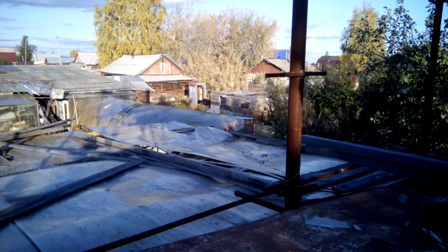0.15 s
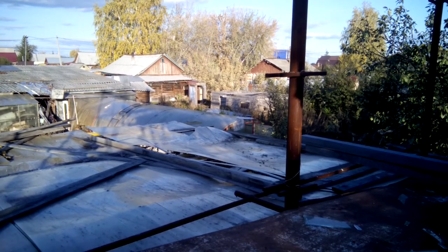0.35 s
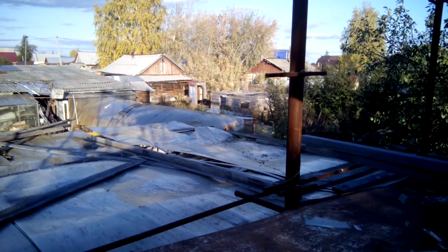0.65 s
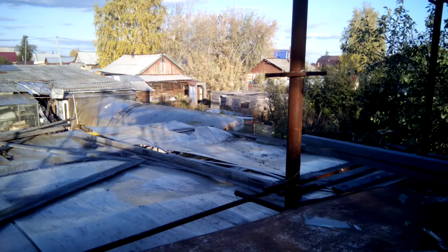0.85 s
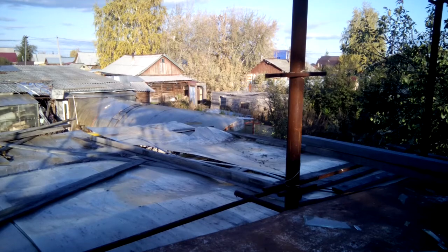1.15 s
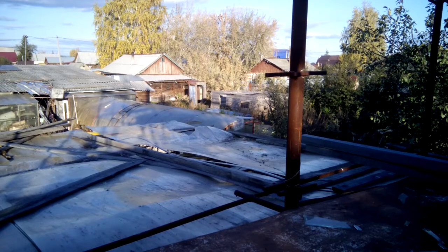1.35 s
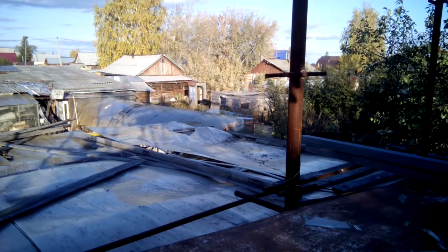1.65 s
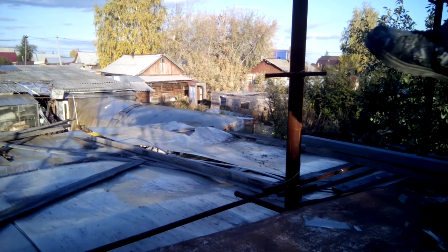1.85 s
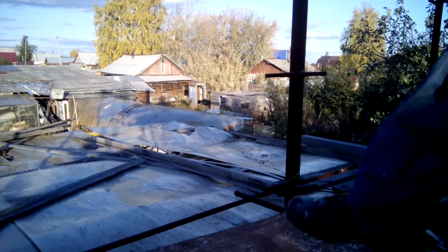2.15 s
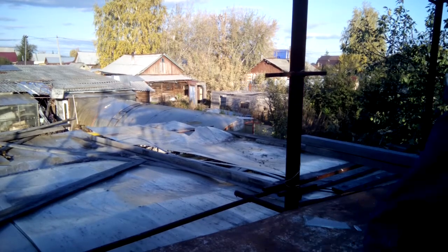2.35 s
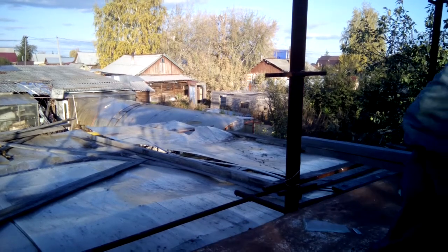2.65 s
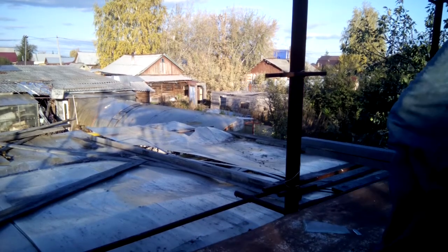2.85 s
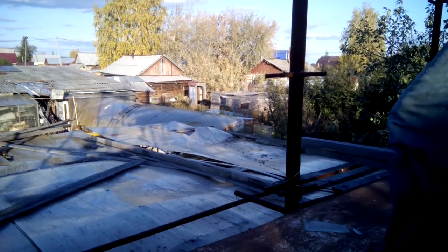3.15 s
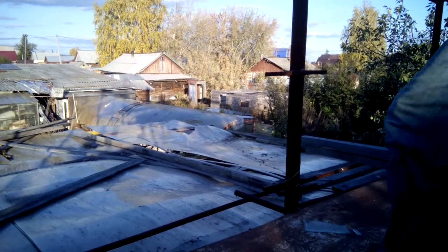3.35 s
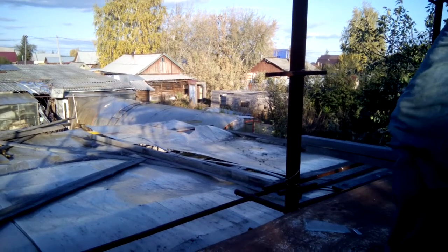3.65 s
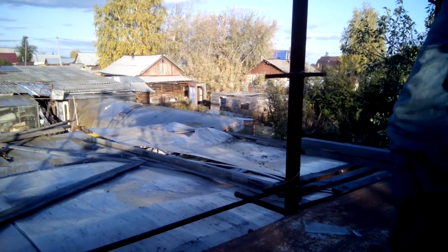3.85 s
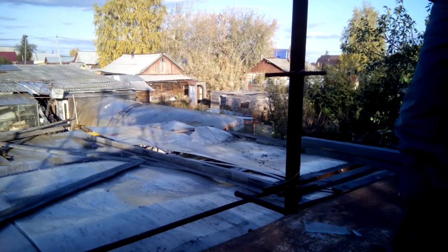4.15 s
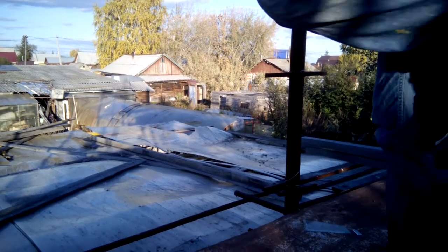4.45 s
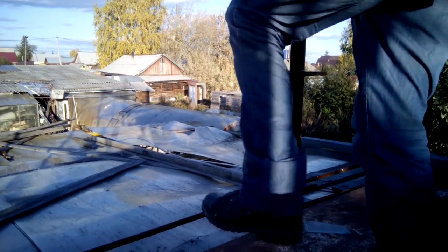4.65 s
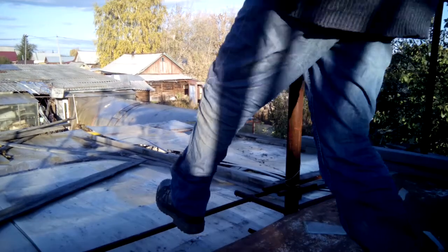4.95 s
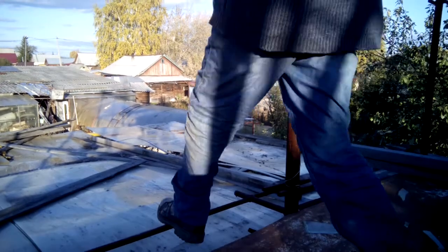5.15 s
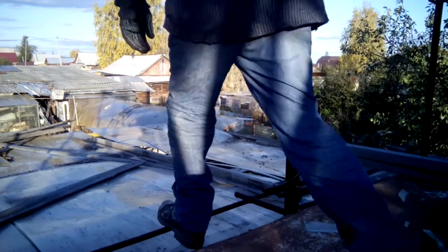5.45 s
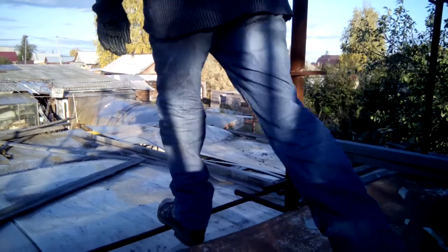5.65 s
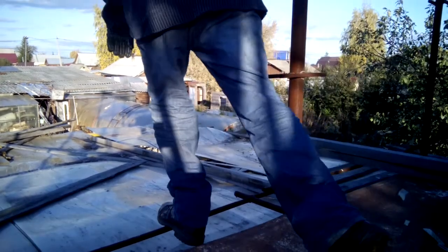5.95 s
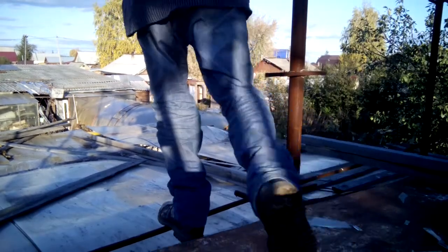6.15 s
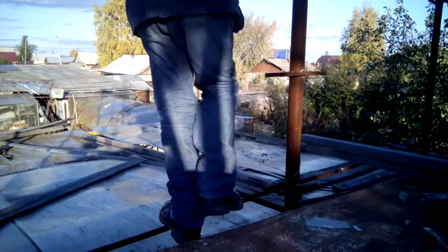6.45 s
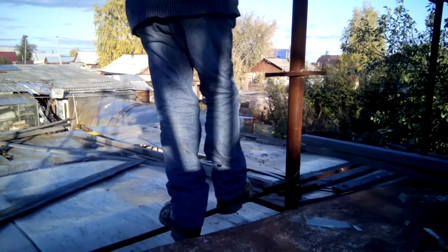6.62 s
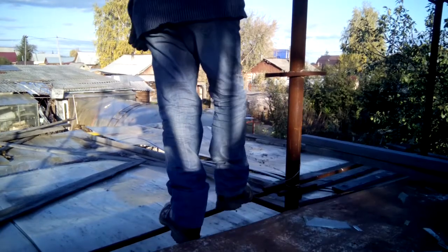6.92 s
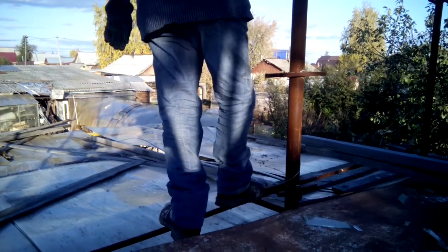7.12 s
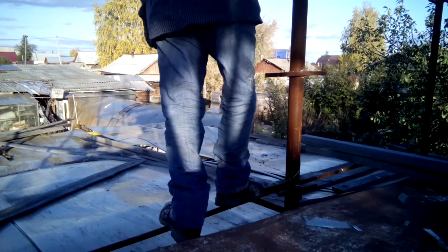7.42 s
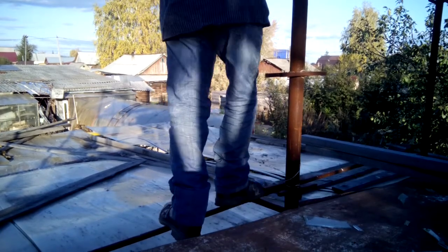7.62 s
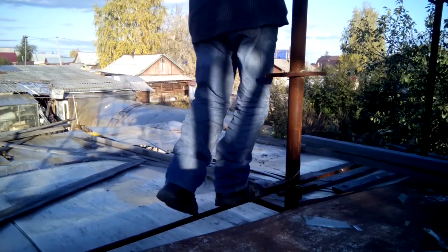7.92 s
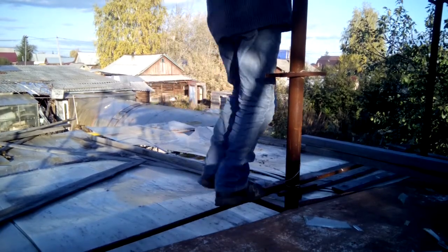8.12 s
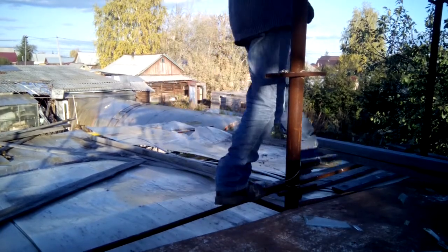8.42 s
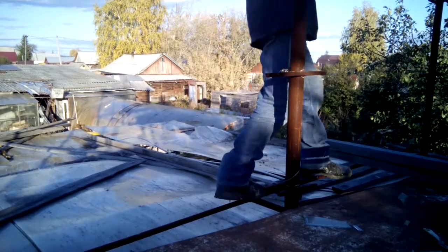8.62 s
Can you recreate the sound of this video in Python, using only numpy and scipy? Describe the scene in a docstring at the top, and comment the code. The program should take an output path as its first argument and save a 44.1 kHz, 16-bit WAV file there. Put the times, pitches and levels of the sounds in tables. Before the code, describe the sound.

Close, uneven boot clacks and gritty shuffles rattle a metal roof outdoors while a machine rumbles softly far away.

```python
"""Boots on a sheet-metal roof

Outdoors, close to the microphone and a little to the left, boots step, shuffle and knock on a roof
and its steel frame. Each contact sets the sheet's dense modes crashing; grit scrapes under the soles,
the sheet snaps, the frame creaks, loose steel chinks. Far off, a machine rumbles and hums over the
village. The microphone's right port hears less treble."""
import sys
import numpy as np
from scipy import signal
from scipy.fft import rfft, irfft, next_fast_len
from scipy.io import wavfile
from scipy.ndimage import uniform_filter1d, map_coordinates

SR = 44100
rng = np.random.default_rng(int(sys.argv[2]) if len(sys.argv) > 2 else 0)


def put_to_file(sound):
    """Save the sound as 16-bit audio at rate SR, in the file named by the first command-line argument."""
    columns = np.atleast_2d(sound).T  # one column per channel
    safe = np.clip(columns, -1, 1)
    whole_steps = np.round(safe * 32767)
    wavfile.write(sys.argv[1], SR, whole_steps.astype(np.int16))


N = 387198

# Boots striking the roof: start_s, level_db, grit_db (relative to level), pitch_hz
KNOCKS = [(0.503, -27, -29, 654), (0.576, -25, -38, 407), (0.619, -30.5, -9.5, 440),
          (0.688, -29.5, -12, 455), (0.748, -20.5, -28.5, 456), (0.793, -25.5, -31, 464),
          (0.817, -21.5, -18.5, 473), (0.882, -20.5, -8.5, 450), (0.945, -32.5, -8, 500),
          (1.08, -31, -8, 563), (1.119, -31.5, -6, 1010), (1.154, -27.5, -15, 423),
          (1.219, -26.5, -26, 495), (1.318, -41, -2, 498), (1.347, -24.5, -10, 420), (1.385, -27, -28, 447),
          (1.478, -53, 0, 506), (1.635, -30.5, -12.5, 553), (1.66, -34, -15, 510), (1.717, -54.5, 7.5, 533),
          (2.156, -12.5, -26.5, 413), (2.392, -8.5, -18.5, 526), (2.581, -24, -19, 550),
          (2.714, -24.5, 1, 397), (2.733, -6.5, -12.5, 598), (2.789, -17, -3.5, 427),
          (2.831, -22.5, -1, 704), (2.884, -37, -3.5, 600), (2.939, -36, -7, 600), (3.174, -20, -14, 643),
          (3.379, -38, -12, 401), (3.408, -34, -4.5, 732), (3.481, -22.5, -9.5, 614),
          (3.589, -26, -12.5, 406), (3.63, -22.5, -5, 705), (3.651, -8.5, -15, 484),
          (3.689, -19.5, -3, 420), (3.728, -19.5, -2, 816), (3.768, -22.5, -6.5, 665),
          (3.823, -12, -17, 564), (3.89, -15.5, -11.5, 1246), (3.982, -18, -15.5, 1045),
          (4.649, -32.5, -19.5, 560), (4.832, 1.5, -14.5, 703), (4.995, -19.5, 0.5, 778),
          (5.059, -18.5, -10.5, 514), (5.299, -26, -10.5, 1190), (5.312, -12.5, -23.5, 576),
          (5.322, -15.5, -20, 580), (5.395, -20, -13, 620), (5.413, -20, -16.5, 424),
          (5.534, -12, -14, 640), (5.558, -15.5, -17.5, 556), (5.669, -22, -8.5, 788),
          (5.722, -13.5, -12, 614), (5.759, -19, -11.5, 472), (6.209, -33.5, -1, 855),
          (6.263, -15, -20, 403), (6.273, 0, -16, 701), (6.735, -24, -12.5, 560),
          (6.742, -28.5, -12.5, 950), (6.849, -40, -12.5, 546), (7.19, -39, -22.5, 800),
          (7.268, -45.5, -9, 788), (8.236, -38.5, -18, 700)]
# The sheet's modes: pitch_hz, level_db
SHEET_MODES = [(275, 2.5), (375, -2), (447, 0), (490, -2.5), (585, -6), (650, -7), (720, -12), (778, -2),
               (860, -3), (1030, -4), (1163, -1), (1357, -2.5), (1590, 7.5), (1837, 4.5), (2250, 4.5),
               (2725, 0), (3224, 3)]
# Body weight landing: start_s, level_db, pitch_hz
LANDINGS = [(0.759, -28.5, 273.5), (2.157, -18.5, 207.7), (2.39, -24.5, 189), (2.794, -19, 172),
            (3.179, -28, 168), (4.844, -26, 149), (5.308, -28, 143), (5.553, -15, 108), (5.751, -26, 139),
            (6.28, -14.5, 348)]
# Soles sliding: middle_s, level_db, half_length_s, crunch_db (offset on CRUNCH_DB)
SLIDES = [(.22, -64, 0.019, -2), (0.653, -44, 0.025, -10), (0.77, -40.5, 0.035, -2),
          (1.175, -46, 0.078, -4), (1.754, -55, 0.11, 5), (2.205, -32, 0.033, 0), (2.306, -49, 0.055, -7),
          (2.648, -35, 0.038, -4), (2.772, -28.5, 0.075, 6.5), (3.196, -44, 0.043, -1),
          (3.338, -54.5, 0.022, -5), (3.715, -30.5, 0.049, 1), (4.123, -54, 0.018, 2),
          (4.678, -53.5, .03, -3), (4.92, -23.5, 0.06, 5), (5.054, -30, 0.027, 5),
          (5.355, -38, 0.045, -1.5), (5.466, -45, 0.044, 4.5), (5.545, -31, 0.045, 3),
          (5.761, -30, 0.064, -1), (6.362, -24.5, 0.061, 1), (6.47, -38, 0.055, -8), (6.65, -36, 0.04, 2.5),
          (6.997, -59.5, 0.008, 0), (7.61, -58, .009, 2), (8.275, -55, 0.038, -10)]
# The sheet buckling: start_s, level_db, t60_s
BUCKLES = [(0.820, -35.5, 0.1), (0.885, -27, 0.079), (1.3167, -47, 0.055), (1.351, -39, .05),
           (1.48, -47.5, .05), (2.737, -22.5, 0.033), (3.633, -26.5, 0.036), (3.8885, -30, 0.043),
           (3.9832, -32.5, .06), (4.994, -14, .07), (5.723, -26, .05)]
# Loose steel touched: start_s, level_db
BAR_TOUCHES = [(4.84, -30), (4.994, -26), (5.024, -31), (5.06, -33), (5.73, -39)]
# The steel bar's modes: pitch_hz, level_db, t60_s
BAR_MODES = [(2218, -8, .15), (3225, -3, .12), (4849, -1, .22), (4985, -5, .08), (5433, -1, .15),
             (6300, -3, .07), (6595, -4, .07), (7190, -1, .08), (7769, -13, .1), (9265, -10, .08)]
# The frame under shifting weight, a faint squeak, tiny pings: start_s, level_db, length_s
FRAME_CREAKS = [(0.578, -45, 0.054), (0.75, -40, 0.1), (1.117, -31, 0.055), (1.2, -36.5, 0.028),
                (1.385, -29.5, 0.041)]
SQUEAKS = [(.2, -64, 0.057)]
PINGS = [(5.163, -61, .008), (5.265, -61.5, .01)]
# Their resonances: pitch_hz, width_hz, level_db
FRAME_HOLLOWS = [(464, 73, -0.5), (1020, 110, -0.5), (2210, 110, -6.5), (2530, 170, -10.5),
                 (2900, 150, -12), (3680, 78, -14)]
SQUEAK_BAND = [(4200, 120, 0)]
PING_BAND = [(7750, 150, 0)]
# The distant background over time: time_s, rumble_db, haze_db
VILLAGE_LEVELS = [(0.0, -29.5, -51), (0.64, -32.5, -52), (5.82, -32.5, -53), (8.78, -36, -55)]
# The far machine's hum: pitch_hz, level_db
HUM_TONES = [(555, -61.5), (1112, -73.5)]

# Noise spectra: frequency_hz, relative_density_db
BOOM_SPECTRUM = [(30, -41), (60, -4.5), (110, 6), (250, 3.5), (450, -2.5), (900, -76)]  # the roof's slow flexing
GRIT_SPECTRUM = [(470, -29), (800, -1), (985, -7.5), (1310, -5.5), (1550, -4), (5950, -17), (8500, -48),
                 (11000, -59.5), (18700, -120)]  # sand between sole and sheet
SIZZLE_SPECTRUM = [(4240, -26.5), (7200, 9), (8250, -11), (9070, -3.5), (11800, -11), (15700, -33)]  # the sand's finest edge
RUB_SPECTRUM = [(210, -32.5), (350, -2), (630, -1), (1170, -7.5), (1660, -9), (6330, -20), (7900, -37),
                (11600, -51), (15700, -69.5)]  # a sole sliding on the sheet
CRUNCH_SPECTRUM = [(3000, -41), (6000, -7), (8000, -2), (12000, -7), (14500, -15.5), (16500, -59.5)]  # grains crushed under the slide
SNAP_SPECTRUM = [(700, -22), (1500, -1), (5000, 6), (7500, -11), (9000, -15.5), (13000, -22.5),
                 (16000, -44.5)]  # the buckling sheet
RUMBLE_SPECTRUM = [(12, -51), (20, -21), (54, -10.5), (74, -3.5), (96, -0.5), (138, -8), (222, -2),
                   (254, -9), (373, -20), (393, -33.5), (480, -46), (620, -65.5), (1060, -120)]  # the far machine
HAZE_SPECTRUM = [(220, -31), (380, -7.5), (503, -5.5), (544, -10), (777, -13), (1010, -11.5), (1430, -17),
                 (1720, -19), (2920, -35), (4370, -34), (15700, -64.5)]  # far village noise

# Likeness of left and right at the microphone: frequency_hz, correlation
STEREO_LIKENESS = [(30, 1), (70, 0.98), (250, 0.97), (500, 0.83), (750, 0.63), (1100, 0.24), (2000, 0.051),
                   (8000, 0.0069)]
# The microphone's unequal ports: frequency_hz, left_minus_right_db
PORT_BALANCE = [(60, -1.2), (500, -1.5), (1200, -1), (2400, 1), (4400, 1), (6500, 4), (8000, 11),
                (14000, 19)]

PANEL_HZ, PANEL_T60_S = 534.5, 0.36  # a reference panel and its rattle's decay
CLANK_HZ, CLANK_SCATTER = 1112, 0.13  # the seam's pitch and its relative scatter from knock to knock
RATTLE_DB, RING_DB, BOOM_DB, SIZZLE_DB = -10, -5, -14, -12  # base gains of a knock's parts
CRUNCH_DB = -32  # base gain of the crunch against its slide


def boot_knocks():
    """Each knock rattles and rings the sheet; boom, grit and sizzle die at their own speeds."""
    t = np.arange(SR // 3) / SR
    ring_t = t[:SR // 6]

    def fade(t60_s, rise_s, tail_db):
        tail = amp(tail_db - 60 * t / 2.3) * (1 - t / t[-1])
        return (1 - np.exp(-t / rise_s)) * (amp(-60 * t / t60_s) + tail)

    crack = 1 + 1.2 * amp(-60 * t / 0.0083)  # the first instant of contact is brightest
    fades = np.array([fade(0.69, 0.0044, -25),  # boom
                      crack * fade(0.26, 0.00036, -23),  # grit
                      crack * fade(0.19, 0.001, -38.5)])  # sizzle
    drive = spread(noise() * amp(0.82 * wobble(220)))  # the rattle comes in lumps
    power, clang = np.zeros((3, N + SR)), np.zeros((2, N + SR))
    for start_s, db, grit_db, pitch in KNOCKS:
        at = round(start_s * SR)
        span = slice(at, at + len(t))
        t60 = PANEL_T60_S * (PANEL_HZ / pitch) ** 0.58  # higher panels die sooner
        rise = 0.00096 * 2 ** (-grit_db / 18.5)  # less grit, softer attack
        clank_hz = CLANK_HZ * (1 + CLANK_SCATTER * rng.standard_normal())
        clank_db = 1 + 0.68 * grit_db + 0.2 * db  # a heavy, gritty contact clanks more
        response = lambda hz: panel(hz, pitch, clank_hz, clank_db)
        rattle = filtered(drive[:, span] * fade(t60, rise, -19.5), response)
        ring = sheet_ring(ring_t, response) * (1 - np.exp(-ring_t / (0.36 * rise)))
        clang[:, span] += amp(db + RATTLE_DB) * rattle
        clang[:, at:at + len(ring_t)] += amp(db + RING_DB) * ring
        boom_db = BOOM_DB - 6.5 * np.log2(pitch / PANEL_HZ)
        sizzle_db = SIZZLE_DB + 1.55 * grit_db + 0.31 * db
        gains = amp(db + np.array([[boom_db], [grit_db], [sizzle_db]]))
        attack = 1 - np.exp(-t / (2.7 * rise))
        damping = amp(-30 * t * (1 / t60 - 1 / PANEL_T60_S))
        power[:, span] += (gains * fades * attack * damping) ** 2
    boom, grit, sizzle = np.sqrt(power[:, :N])
    sand = lumps(0.47, 300) * shimmer(depth_db=2.5)
    return (clang[:, :N] + coloured(boom * drive, BOOM_SPECTRUM)
            + coloured(grit * sand, GRIT_SPECTRUM)
            + coloured(sizzle * lumps(1.9, 150) * sand, SIZZLE_SPECTRUM))


def panel(hz, pitch, clank_hz, clank_db):
    """Response of the panel under the boot: a hump of modes, and another where the seam clanks."""
    highpass = 1j * hz / (1j * hz + 300)
    lowpass = 1 / (1 + 1j * hz / 2400) ** 3
    body = resonance(hz, pitch, .35 * pitch) * highpass * lowpass
    return body - amp(clank_db) * resonance(hz, clank_hz, 0.39 * clank_hz) ** 2


def sheet_ring(t, response):
    """The blow rings the modes that the panel favours; high modes die sooner."""
    hz, db = np.transpose(SHEET_MODES)[..., None]
    detune, side, strength = rng.standard_normal((3, len(SHEET_MODES), 1))
    phase = 2 * np.pi * hz * (1 + 0.011 * detune) * t  # each spot tunes the modes a little differently
    lead = stereo_angle(hz) * side
    t60 = 0.35 * PANEL_T60_S * (500 / hz) ** 0.53
    envelope = np.abs(response(hz)) * amp(db + 3.9 * strength - 60 * t / t60)
    return np.array([(envelope * np.sin(phase + shift)).sum(0) for shift in (lead, -lead)])


def roof_thuds(t60_s=0.3):
    """Three close flexing modes of the roof beat and die after each landing."""
    out, t = np.zeros(N + SR), np.arange(SR // 2) / SR
    attack = 1 - np.exp(-t / 0.00098)
    for start_s, db, pitch in LANDINGS:
        hz = pitch * (np.array([[.86], [1], [1.35]]) + 0.022 * rng.standard_normal((3, 1)))
        flex = (amp([[-6], [0], [-7]]) * np.sin(2 * np.pi * hz * t)).sum(0)
        out[round(start_s * SR):][:len(t)] += amp(db - 60 * t / t60_s) * attack * flex
    return out[:N]


def sole_scrapes():
    """Clumped grit swells and fades under each sliding sole; some grains crush with a bright crackle."""
    t = np.arange(0, N, 32) / SR
    middle_s, db, half_s, crunch_db = np.transpose(SLIDES)[..., None]
    steepness = np.where(t < middle_s, 3.6, 2.1)  # a stroke starts more steeply than it ends
    rub_power = amp(2 * db) * np.exp(-np.abs((t - middle_s) / half_s) ** steepness)
    crunch_power = rub_power * amp(2 * (crunch_db + CRUNCH_DB))
    stroke, crush = (per_sample(t, np.sqrt(power.sum(0))) for power in (rub_power, crunch_power))
    clumps = unit(amp(2.2 * wobble(40) + 2.4 * wobble(400)))
    grains = unit(amp(2.5 * wobble(60) + 4.5 * wobble(700)))
    rub = coloured(clumps * shimmer(depth_db=2), RUB_SPECTRUM)
    crunch = coloured(grains * shimmer(depth_db=2), CRUNCH_SPECTRUM)
    return stroke * rub + crush * crunch


def sheet_snaps():
    """The sheet buckles with a bright crack, over within a few hundredths of a second."""
    bursts, t = np.zeros(N + SR), np.arange(SR // 8) / SR
    onset = (1 + 0.87 * amp(-60 * t / 0.0089)) * (1 - np.exp(-t / 0.001))
    for start_s, db, t60 in BUCKLES:
        bursts[round(start_s * SR):][:len(t)] += amp(db - 60 * t / t60) * onset
    crackle = lumps(3.2, 400) * shimmer(depth_db=3)
    return bursts[:N] * unit(coloured(crackle, SNAP_SPECTRUM))


def steel_chinks():
    """A loose steel bar rings at new strengths on each touch, roughened by chatter on its seat."""
    out, t = np.zeros((2, N + SR)), np.arange(SR // 4) / SR
    hz, mode_db, t60 = np.transpose(BAR_MODES)[..., None]
    attack = 1 - np.exp(-t / .003)
    for start_s, db in BAR_TOUCHES:
        strength, phase = rng.standard_normal((2, 2, len(BAR_MODES), 1))
        tones = amp(mode_db + 3 * strength - 60 * t / t60) * np.sin(2 * np.pi * hz * t + 2 * phase)
        out[:, round(start_s * SR):][:, :len(t)] += amp(db) * tones.sum(1) * attack
    chatter = .6 + np.array([wobble(300), wobble(300)])
    return out[:, :N] * chatter


def creaks(events, hollows):
    """Fast uneven slips, starting at once and easing off, sound through hollow resonances."""
    t = np.arange(N) / SR
    load = sum(amp(db) * (t > start_s) * np.exp(-((t - start_s) / length_s) ** 4)
               for start_s, db, length_s in events)
    body = lambda hz: sum((-1) ** k * amp(db) * resonance(hz, pitch, width)
                          for k, (pitch, width, db) in enumerate(hollows))
    return filtered(load * lumps(2.8, 300) * spread(noise()), body)


def far_village():
    """A distant machine's lumpy rumble and faint wavering hum, with a thin haze of village noise."""
    t = np.arange(N) / SR
    times, rumble_db, haze_db = np.transpose(VILLAGE_LEVELS)
    rumble = amp(per_sample(times, rumble_db) + 0.96 * wobble(10))
    rumble = rumble * coloured(spread(noise()), RUMBLE_SPECTRUM)
    haze = amp(per_sample(times, haze_db) + 2.3 * wobble(2.8))
    haze = haze * coloured(spread(noise()), HAZE_SPECTRUM)
    hum = sum(amp(db + 1.5 * wobble(28)) * np.sin(2 * np.pi * hz * t + 0.78 * wobble(5.4))
              for hz, db in HUM_TONES)
    return (rumble + haze + hum) * np.minimum(t / .01, 1)


def shimmer(depth_db):
    """Stereo noise whose narrow bands flare and fade, as the many high modes of thin metal do."""
    bands = signal.stft(noise(), nperseg=256)[2]
    flare = uniform_filter1d(rng.standard_normal(bands.shape[1:]), size=2, axis=0)
    flare = unit(uniform_filter1d(flare, size=6, axis=1))
    pair = signal.istft(bands * amp(depth_db * flare), nperseg=256)[1]
    return unit(spread(pair[:, :N]))


def spread(pair):
    """Two unrelated signals become left and right, alike in the bass and unrelated in the treble."""
    weights = lambda hz: np.array([np.cos(stereo_angle(hz)), np.sin(stereo_angle(hz))])
    mid, side = filtered(pair, weights)
    return np.array([mid + side, mid - side]) / 2


def stereo_angle(hz):
    """Mid-to-side angle in radians that gives the left-right likeness."""
    return np.arccos(np.clip(along(STEREO_LIKENESS, hz), -1, 1)) / 2


def resonance(hz, centre_hz, width_hz):
    """Complex band-pass response."""
    return 1j * hz * width_hz / (centre_hz ** 2 - hz ** 2 + 1j * hz * width_hz)


def filtered(x, response):
    """x through a frequency response, scaled so that white noise keeps its rms."""
    size = next_fast_len(x.shape[-1] + 4096)
    gain = response(np.fft.rfftfreq(size, 1 / SR))
    return irfft(rfft(x, size) * gain / np.sqrt(np.mean(np.abs(gain) ** 2)), size)[..., :x.shape[-1]]


def coloured(x, spectrum):
    """x shaped by (Hz, dB) points."""
    return filtered(x, lambda hz: amp(along(spectrum, hz)))


def noise():
    """Two unrelated white noises."""
    return rng.standard_normal((2, N))


def wobble(rate):
    """A smooth random curve, rate knots a second."""
    return map_coordinates(rng.standard_normal(int(N * rate / SR) + 4), [np.arange(N) * rate / SR])


def lumps(depth_db, rate):
    """An uneven gain of rms 1."""
    return unit(amp(depth_db * wobble(rate)))


def along(points, hz):
    """(Hz, value) points interpolated on a log axis."""
    point_hz, values = np.transpose(points)
    return np.interp(np.log(hz + 1), np.log(point_hz + 1), values)


def per_sample(times_s, values):
    """Values interpolated to every sample."""
    return np.interp(np.arange(N) / SR, times_s, values)


def amp(db):
    """Decibels to gain."""
    return np.exp(np.asarray(db) * np.log(10) / 20)


def unit(x):
    """Scaled to rms 1."""
    return x / np.sqrt(np.mean(x ** 2) + 1e-20)


def scene():
    """At the microphone: the walker close by and a little to the left, the village far behind."""
    roof = boot_knocks() + roof_thuds() + sole_scrapes() + steel_chinks() + sheet_snaps()
    roof += creaks(FRAME_CREAKS, FRAME_HOLLOWS) + creaks(SQUEAKS, SQUEAK_BAND) + creaks(PINGS, PING_BAND)
    left_db = 1.7
    return roof * amp([[left_db / 2], [-left_db / 2]]) + far_village()


def record(dry):
    """The microphone's unequal ports, soft clipping at full scale, then the band limit."""
    size = next_fast_len(N + 4096)
    hz = np.fft.rfftfreq(size, 1 / SR)
    tilt_db = along(PORT_BALANCE, hz) / 2
    picked_up = irfft(rfft(dry, size) * amp([tilt_db, -tilt_db]), size)[:, :N]
    clipped = picked_up / (1 + np.abs(picked_up) ** 8) ** (1 / 8)
    return irfft(rfft(clipped, size) * (hz < 15700), size)[:, :N]


dry = scene()
out = record(dry)
put_to_file(out)
```